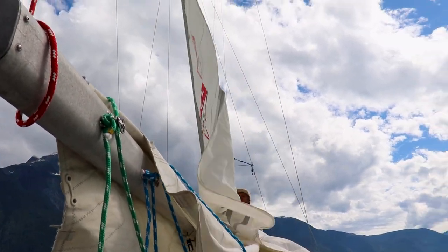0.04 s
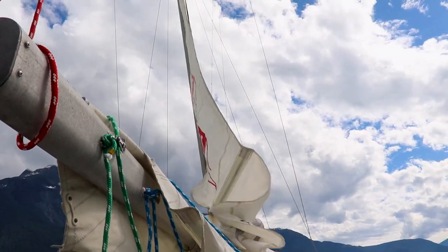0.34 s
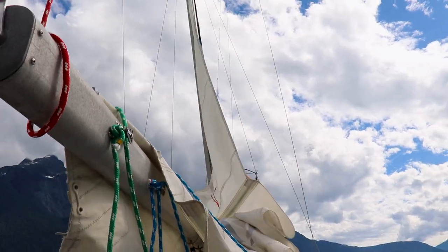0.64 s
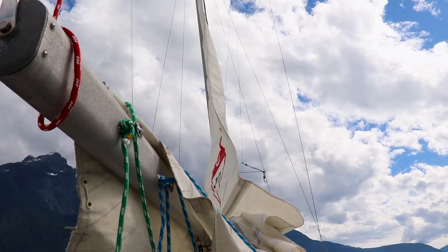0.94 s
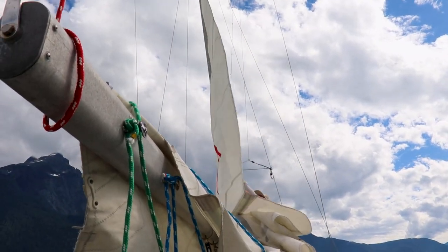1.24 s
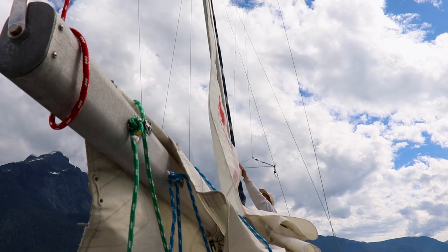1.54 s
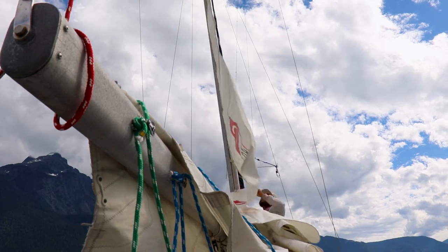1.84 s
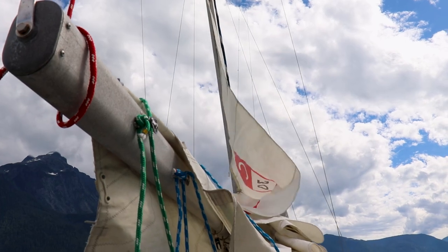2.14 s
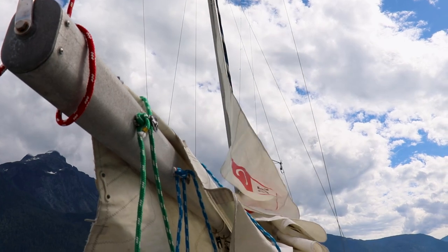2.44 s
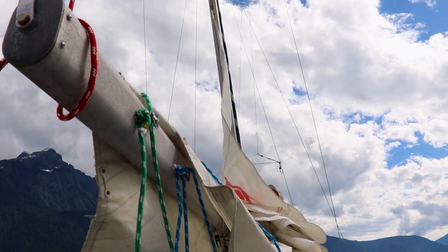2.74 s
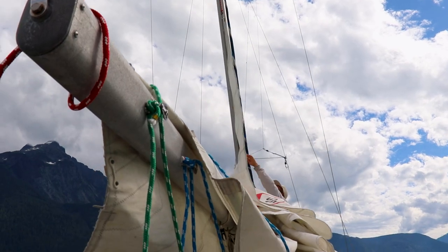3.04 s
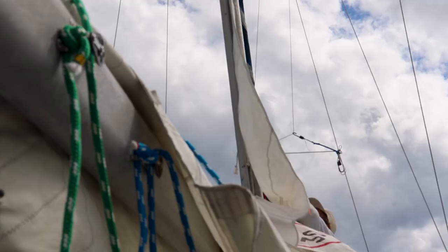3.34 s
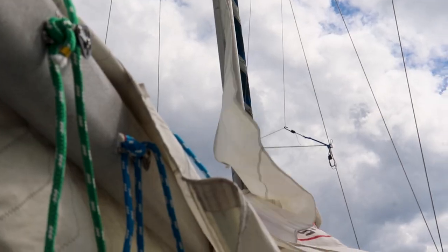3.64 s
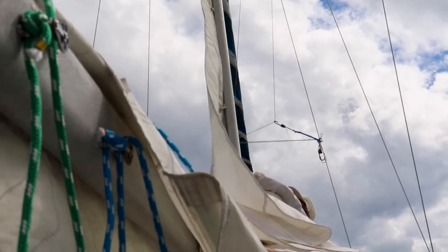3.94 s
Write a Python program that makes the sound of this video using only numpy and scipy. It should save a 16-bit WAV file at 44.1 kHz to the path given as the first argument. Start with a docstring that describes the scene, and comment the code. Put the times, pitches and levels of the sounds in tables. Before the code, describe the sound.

A loose sail flaps, rustles and snaps on a sailing boat, hardest at the start and again midway, then settles. Small fittings tick against the rigging and gusts buffet the microphone, over a steady engine drone and soft wind and water.

```python
"""A loose foresail flaps, rustles and snaps as it is taken down on the deck of a sailing boat.
Each flap pushes a puff of air; the cloth crumples and slides, and its creases snap through.
Small fittings tick against the rigging, and gusts of wind buffet the microphone.
Behind it all are a soft wash of wind and water and the steady drone of the inboard engine."""
import sys
import numpy as np
from scipy import signal
from scipy.fft import rfft, irfft
from scipy.io import wavfile
from scipy.ndimage import uniform_filter1d

SR = 44100
rng = np.random.default_rng(int(sys.argv[2]) if len(sys.argv) > 2 else 0)


def digitize_waveform(pressure):
    """Quantize a signal to 16-bit integers and store it at the path in sys.argv[1].

    Rows of a 2-D input are taken as channels; values are limited to [-1, 1].
    """
    field = np.atleast_2d(pressure).T
    bounded = np.clip(field, -1, 1)
    quanta = np.round(bounded * 32767).astype(np.int16)
    wavfile.write(sys.argv[1], SR, quanta)


N = 176400
TIME = np.arange(N) / SR


# Puffs of air from the sail: time_s, level_db, pitch_hz
SAIL_FLAPS = [(0.086, -16.5, 42), (0.21, -21.5, 48), (0.271, -17, 61.3), (0.337, -10.5, 77.5),
              (0.408, -15, 72), (0.483, -16, 45.4), (1.687, -24, 50), (1.806, -20, 42.2),
              (2.03, -21.5, 34.7), (2.336, -24, 35), (2.882, -31, 61.6)]

def sail_flaps(width_s=0.008):
    """Each flap pushes the air once: a low wave so short that it sounds like a thump."""
    puffs = np.zeros(N)
    for time_s, level_db, pitch_hz in SAIL_FLAPS:
        swell = np.exp(-((TIME - time_s - width_s / 2) / width_s) ** 2 / 2)
        puffs += from_db(level_db) * swell * np.sin(2 * np.pi * pitch_hz * (time_s - TIME))
    return puffs


# How hard the cloth rubs and crumples: time_s, level_db
RUSTLE_LEVEL = [(0, -48), (.1, -45.5), (.26, -45), (.42, -45.5), (.48, -52.5), (.55, -45.5), (.62, -52),
                (.72, -49.5), (.86, -50.5), (1.1, -52.5), (1.35, -53), (1.44, -47.5), (1.6, -50.5),
                (1.75, -49), (1.87, -50.5), (2.08, -44), (2.18, -48), (2.3, -45), (2.38, -51), (2.47, -46),
                (2.58, -46), (2.68, -49.5), (2.81, -45), (2.95, -50.5), (3.2, -52), (3.55, -52.5),
                (3.68, -48.5), (3.77, -51.5), (3.9, -50), (4, -46)]
# Tone of the cloth, from low to high: pitch_hz, relative_db
CLOTH_TONE = [(200, -39), (500, 5), (950, 6.5), (1400, -0.5), (2000, -2.5), (2600, -2), (3500, -2.5),
              (4400, -14), (5500, -15), (8000, -32.5), (15000, -62)]

def cloth_rustle(crinkles_per_s=780, crinkle_share=0.46):
    """Crumpling cloth makes many tiny clicks, and rubbing adds a smooth noise."""
    sizes = from_db(np.minimum(rng.exponential(1, N), 4)) * rng.choice([-1, 1], N)
    crinkles = coloured(sizes * (rng.random(N) < crinkles_per_s / SR), CLOTH_TONE)
    level_db = in_time(RUSTLE_LEVEL) + 1.5 * drift(20)  # the level flickers
    rubbing = noise(CLOTH_TONE)
    return from_db(level_db) * (np.sqrt(crinkle_share) * crinkles + np.sqrt(1 - crinkle_share) * rubbing)


# Snaps of the cloth: start_s, level_db, pitch_hz, half_width_octaves
CREASE_SNAPS = [(0.0345, -32, 1260, 0.41), (0.0751, -33.5, 1530, 0.85), (.086, -28.5, 1110, 0.78),
                (.1735, -26.5, 1420, 0.64), (0.2044, -44, 1200, .4), (.2189, -29.5, 1280, .6),
                (.3626, -30, 1560, 0.49), (0.5515, -30.5, 990, 0.42), (0.681, -36, 1950, 0.24),
                (0.7246, -33.5, 2110, 0.88), (0.7443, -28, 904, 0.28), (0.833, -32, 1270, 0.27),
                (.9682, -39, 980, 0.23), (1.4205, -37.5, 1190, 0.43), (2.067, -27, 975, 0.2),
                (2.444, -38, 850, 0.6), (2.464, -24, 650, .4), (2.551, -26, 1200, 0.83),
                (2.5661, -25.5, 1180, 0.69), (2.577, -29, 1040, 0.39), (2.6226, -33, 1980, 0.61),
                (3.8568, -33.5, 980, 0.49), (3.896, -28.5, 1350, 0.53), (3.923, -39, 1090, .4)]

def crease_snaps():
    """A crease in the sail pops through with a sharp crack."""
    return cracks(CREASE_SNAPS, decay_s=0.003, tail_s=0.025, tail_db=-31)


# Slides of the cloth: middle_s, length_s, level_db
CLOTH_SLIDES = [(0.263, 0.086, -60), (0.533, 0.038, -57), (0.673, 0.091, -62), (0.868, 0.29, -59),
                (2.085, 0.084, -58), (2.59, 0.027, -58), (2.81, 0.21, -60.5), (3.852, 0.33, -65)]
# Tone of the sliding: pitch_hz, relative_db
SLIDE_TONE = [(1000, -18), (4000, 0.5), (6500, -6), (10000, -16), (15000, -14.5)]

def cloth_slides():
    """Cloth sliding over cloth gives a hiss that swells and fades."""
    swells = sum(from_db(level_db) * np.exp(-2 * ((TIME - middle_s) / length_s) ** 2)
                 for middle_s, length_s, level_db in CLOTH_SLIDES)
    return swells * noise(SLIDE_TONE)


# Knocks of the fittings: start_s, level_db, pitch_hz, half_width_octaves
FITTING_TICKS = [(.0747, -51, 5160, 0.32), (.2189, -51, 5940, .6), (.2698, -33.5, 3300, 0.18),
                 (.367, -30, 3420, 0.19), (.368, -50, 7300, 0.23), (.7248, -38, 4570, 0.4),
                 (1.4212, -41.5, 5360, 0.21), (1.4626, -42, 4650, 0.18), (1.5565, -38, 3120, 0.28),
                 (1.6676, -29, 3300, 0.27), (1.6676, -55, 12000, 0.59), (1.669, -25, 2840, 0.41),
                 (1.681, -33, 3180, 0.39), (1.7344, -47, 5470, 0.43), (2.066, -33, 4370, 0.26),
                 (2.2727, -28, 3220, .14), (2.287, -30, 2930, 0.34), (2.3955, -44.5, 5500, 0.45),
                 (2.4798, -45, 3370, 0.22), (2.5661, -33, 2780, 0.33), (2.597, -35, 3470, 0.13),
                 (2.6064, -37, 4070, 0.25), (2.8669, -36, 4430, 0.32), (3.2385, -42, 4650, 0.2),
                 (3.3144, -45, 4570, 0.32), (3.6082, -38, 5000, 0.19), (3.653, -49, 12500, 0.46),
                 (3.714, -38, 3440, 0.38), (3.7878, -32.5, 3270, 0.22), (3.8322, -36.5, 3400, 0.24)]

def fitting_ticks():
    """Clips and shackles knock on the wire that holds the sail; some ring, others just click."""
    return cracks(FITTING_TICKS, decay_s=0.001, tail_s=0.014, tail_db=-15)


# Strength of the gusts: time_s, level_db
GUST_LEVEL = [(0, -46), (.09, -20.5), (.24, -22.5), (.36, -21), (.48, -24), (.52, -32), (.66, -26),
              (.9, -36), (1.2, -42), (1.6, -35), (1.78, -26.5), (1.97, -33), (2.15, -28.5), (2.35, -29.5),
              (2.55, -35.5), (2.88, -37.5), (3.1, -40), (3.45, -39), (3.62, -37), (3.75, -41), (4, -38)]
# Tone of the gusts: pitch_hz, relative_db
GUST_TONE = [(15, -4), (25, 2), (45, -2), (70, -6), (100, -10.5), (150, -21), (300, -30.5), (1000, -78)]

def wind_gusts():
    """Air swirling on the microphone makes a low rumble that follows the gusts."""
    swirls = noise(GUST_TONE)
    power = uniform_filter1d(swirls ** 2, size=2500)
    evened = swirls / np.sqrt(power + 0.3)  # partly smooths out chance swells
    return from_db(in_time(GUST_LEVEL)) * evened


# Steady tones of the engine and exhaust: multiple_of_cycle_rate, level_db
ENGINE_TONES = [(7, -47), (8, -39.5), (9, -53), (10, -59), (11, -52), (12, -49.5), (13, -53.5), (14, -56.5),
                (15, -53), (16, -53), (17, -54), (18, -57), (19, -51), (20, -56), (22, -54), (23, -53.5),
                (25, -53.5), (26, -49.5), (28, -58), (29, -54.5), (32, -55), (33, -55), (34, -54.5),
                (35, -58), (36, -58), (37, -59), (38, -59.5), (39, -60), (41, -66), (42, -64), (43, -62),
                (44, -53), (45, -58.5), (62, -64), (79, -73)]
# The strongest tone fades for a moment: time_s, change_db
BOOM_CHANGE = [(0, 3), (.7, 3), (1.4, 2.5), (2.8, 3), (3.15, 0), (3.5, -9), (3.8, 1), (4, 2)]
# Tone of the engine's rough noise: pitch_hz, relative_db
CLATTER_TONE = [(30, -13), (100, 5), (200, 4.5), (400, 0.5), (600, -1), (750, -1.5), (1000, -4),
                (1400, -19), (2400, -21), (5000, -36), (15000, -42)]
# Loudness of that rough noise: time_s, level_db
CLATTER_LOUDNESS = [(0, -43), (.5, -43.5), (1.2, -45), (2, -45), (2.75, -43), (3.3, -46), (4, -44.5)]

def engine(cycle_hz=17.644, knocks_per_cycle=4, boom_multiple=8, drone_boost_db=1.4):
    """The repeating engine cycle hums in many tones, and a rough noise swells with every knock."""
    speed_hz = cycle_hz * (1 + 0.0004 * drift(0.92))
    angle = 2 * np.pi * np.cumsum(speed_hz) / SR
    drone = np.zeros(N)
    for multiple, level_db in ENGINE_TONES:
        wavering_db = level_db + drift(3.2)
        if multiple == boom_multiple:
            wavering_db += in_time(BOOM_CHANGE)
        drone += from_db(wavering_db) * np.sin(multiple * angle + rng.uniform(0, 2 * np.pi))
    knocks = 1 + 0.3 * np.cos(knocks_per_cycle * angle) + 0.35 * np.cos(angle)  # plus one throb a cycle
    clatter = from_db(in_time(CLATTER_LOUDNESS)) * rms_one(knocks * noise(CLATTER_TONE))
    return from_db(drone_boost_db) * drone + clatter


# Tone of the wind and water: pitch_hz, relative_db
WASH_TONE = [(300, 10), (900, 4), (1600, 1), (2100, -1), (2450, 8.5), (2900, -10.5), (3600, 3),
             (4400, -9.5), (5200, -4), (7000, -14), (10000, -23.5), (15000, -54)]

def wind_and_water(level_db=-55):
    """Wind and water around the boat blend into a soft, nearly even wash."""
    return from_db(level_db + 0.5 * drift(19)) * noise(WASH_TONE)


def cracks(rows, decay_s, tail_s, tail_db, broad_share=0.22, broad_octaves=0.7):
    """Each crack is a short burst of noise around one pitch, with a weak scatter off the deck."""
    size = 8192
    out, t = np.zeros(N + size), np.arange(size) / SR
    fade = np.exp(-t / decay_s) + from_db(tail_db) * np.exp(-t / tail_s)
    for start_s, level_db, pitch_hz, half_width_octaves in rows:
        burst = rng.choice([-1, 1], size) * fade
        ringing = around_pitch(burst, pitch_hz, half_width_octaves)
        broad = around_pitch(burst, pitch_hz, broad_octaves)
        crack = (1 - broad_share) * ringing + broad_share * broad
        start = int(start_s * SR)
        out[start:start + size] += from_db(level_db) * crack / np.abs(crack).max()
    return out[:N]


def around_pitch(x, pitch_hz, octaves):
    """Keep the sound within so many octaves on each side of a pitch."""
    edges_hz = [pitch_hz / 2 ** octaves, min(pitch_hz * 2 ** octaves, 0.45 * SR)]
    return signal.sosfilt(signal.butter(2, edges_hz, "band", fs=SR, output="sos"), x)


def from_db(db):
    """Turn decibels into a number to multiply by."""
    return 10 ** (np.asarray(db) / 20)


def rms_one(x):
    """Scale a signal so that its average strength (rms) is 1."""
    return x / np.sqrt(np.mean(x ** 2) + 1e-20)


def in_time(rows):
    """Join (time_s, value) points with straight lines."""
    return np.interp(TIME, *np.transpose(rows))


def drift(rate_hz):
    """A smooth random wobble, about 1 in size; a higher rate wobbles faster."""
    hold = np.exp(-200 * np.pi * rate_hz / SR)
    steps = rng.standard_normal(N // 100 + 1002)  # one step every 100 samples
    slow = signal.lfilter([1], [1, -2 * hold, hold * hold], steps)[1000:]
    return np.interp(np.arange(N) / 100, np.arange(len(slow)), rms_one(slow))


def coloured(x, tone):
    """Shape the lows and highs of a signal with a tone table; the result has strength 1."""
    hz, db = np.transpose(tone)
    bins_hz = np.maximum(np.fft.rfftfreq(N, 1 / SR), 1)
    gain = from_db(np.interp(np.log(bins_hz), np.log(hz), db)) * (bins_hz > 10)
    return rms_one(irfft(rfft(x) * gain, N))


def noise(tone):
    """Smooth noise shaped by a tone table."""
    return coloured(rng.standard_normal(N), tone)


def scene():
    """All the sounds add up in the open air, in one channel."""
    background = engine() + wind_gusts() + wind_and_water()
    sail = sail_flaps() + cloth_rustle() + crease_snaps() + cloth_slides()
    return (sail + fitting_ticks() + background)[None]


def record(dry):
    """Cut away the very highest treble."""
    cutoff_hz = 15700
    return signal.sosfilt(signal.ellip(10, 0.1, 80, cutoff_hz, fs=SR, output="sos"), dry)


dry = scene()
out = record(dry)
digitize_waveform(out)
```